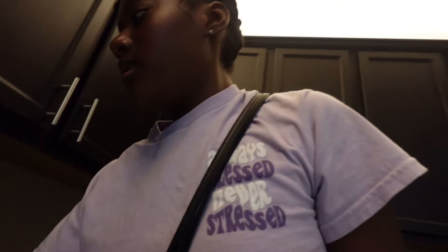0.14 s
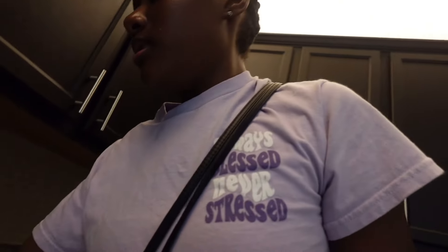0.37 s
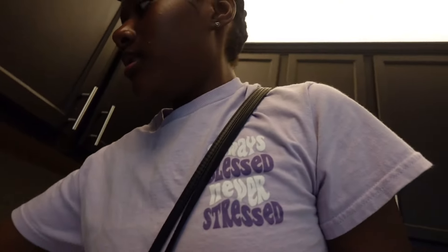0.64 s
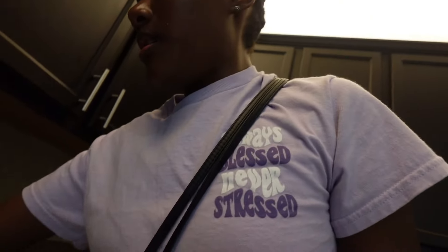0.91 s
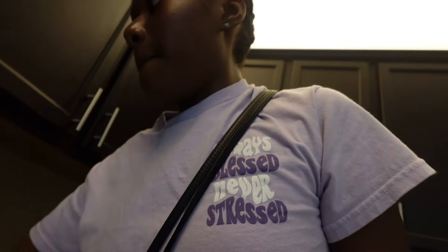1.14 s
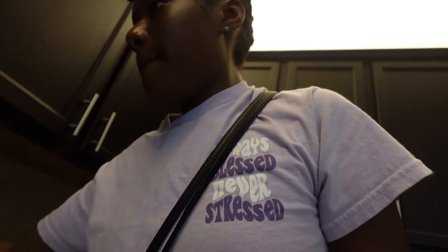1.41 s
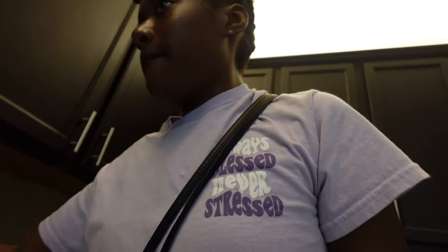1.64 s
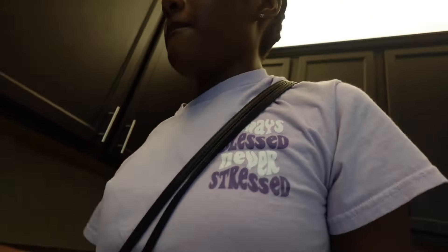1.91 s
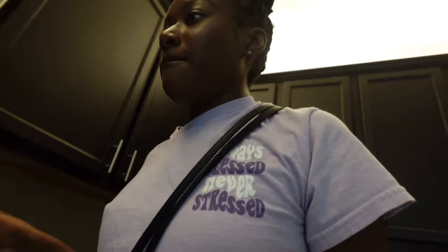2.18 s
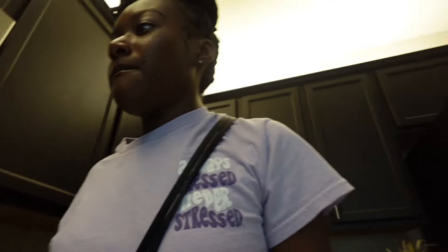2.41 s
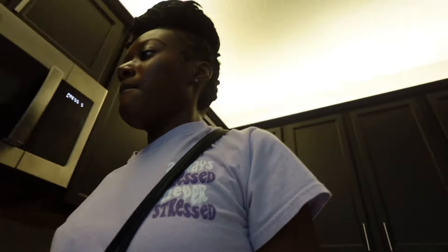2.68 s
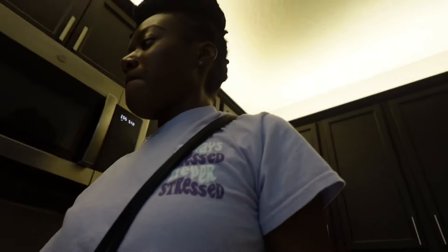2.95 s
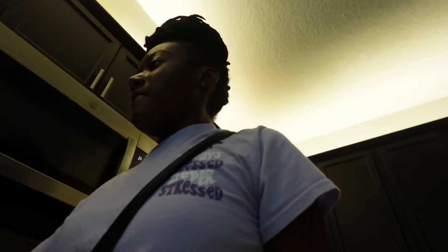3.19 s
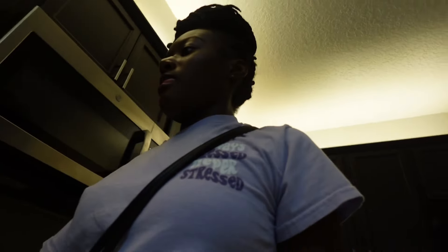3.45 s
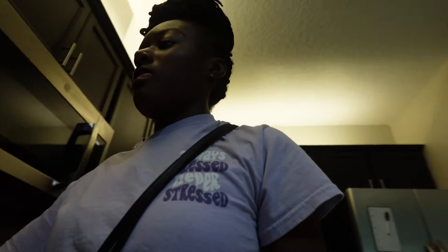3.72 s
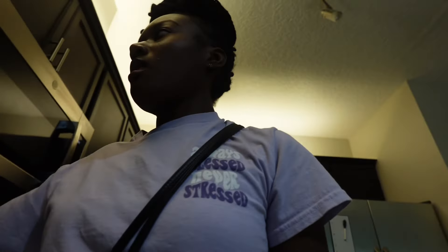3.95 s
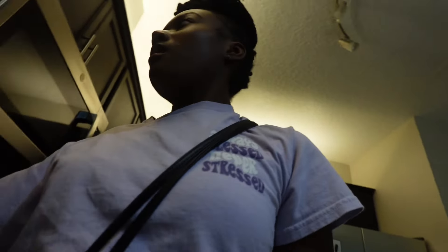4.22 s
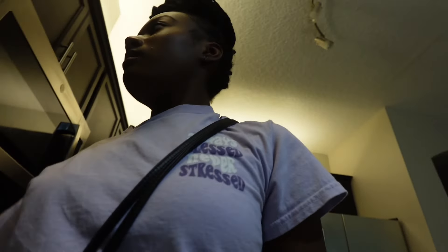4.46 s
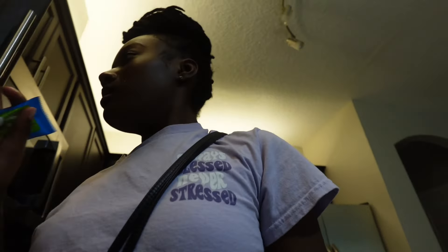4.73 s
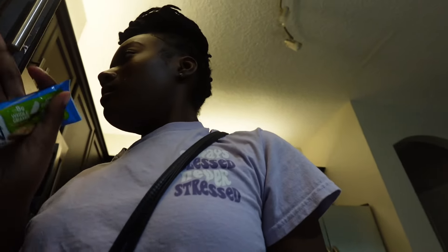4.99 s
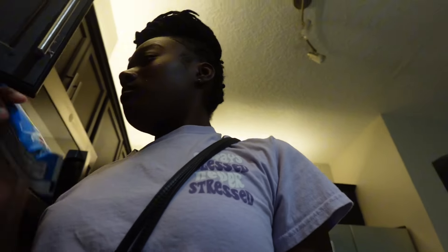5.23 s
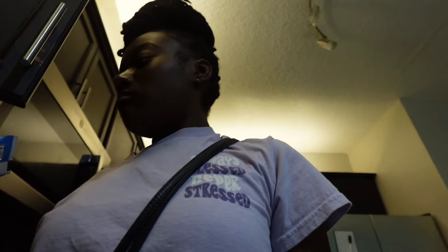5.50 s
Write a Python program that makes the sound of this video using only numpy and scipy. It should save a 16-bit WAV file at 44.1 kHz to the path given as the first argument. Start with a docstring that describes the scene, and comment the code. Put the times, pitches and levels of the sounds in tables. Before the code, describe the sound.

Close microphone, live kitchen room, faint air and appliance hum. An opening wooden bang rattles shelves and something slides. Dense plastic wrapper snaps follow, thin out briefly, then a light latch knock and a second heavy door thud. Afterwards packets held near the microphone crackle crisply and irregularly, the loudest snaps slightly clipped.

```python
"""A small hard kitchen, microphone close: room air and two faint appliance tones that end by 3.2 s.
A cupboard blow sets resonant panels rattling, with a hollow pop and a smooth glide of filtered noise.
From 0.7 s a hand grips stiff packets: noise-burst snaps over dense crackle, with decaying sine pops.
From 2.1 s the packets are held near the microphone; a latch at 2.7 s and a door blow at 3.3 s ring too.
The room answers the packets and pops, and the loudest snaps overload the recorder."""
import sys
import numpy as np
from scipy import signal
from scipy.fft import rfft, irfft, next_fast_len
from scipy.io import wavfile
from scipy.ndimage import map_coordinates

SR = 44100
rng = np.random.default_rng(int(sys.argv[2]) if len(sys.argv) > 2 else 0)


def elevation(decibels):
    """Turn decibel levels (scalar or array-like) into linear amplitude ratios."""
    levels = np.asarray(decibels, float)
    return 10 ** (levels / 20)


def generate_wav(sig):
    """Save sig (samples, or channels by samples) to the path in sys.argv[1] as 16-bit PCM at SR."""
    pcm = np.round(np.clip(np.atleast_2d(sig).T, -1, 1) * 32767).astype(np.int16)
    wavfile.write(sys.argv[1], SR, pcm)


N = 248008
LIFTED_S = 2.1  # the packets lie inside the cupboard until now, then are held near the microphone


def unit(x):
    """Scaled to rms 1."""
    return x / np.sqrt(np.mean(x ** 2) + 1e-20)


def along(points, hz):
    """Values at hz, from (Hz, value) points on a log axis."""
    f, v = np.transpose(points)
    return np.interp(np.log(hz + 1), np.log(f + 1), v)


def wobble(rate):
    """A smooth random curve, rate knots a second."""
    knots = rng.standard_normal(int(N * rate / SR) + 4)
    return map_coordinates(knots, [np.arange(N) * rate / SR])


def filtered(x, response):
    """x times a complex response of frequency."""
    m = next_fast_len(x.shape[-1] + 8192)
    return irfft(rfft(x, m) * response(np.fft.rfftfreq(m, 1 / SR)), m)[..., :x.shape[-1]]


def coloured(x, spectrum):
    """x through a (Hz, dB) spectrum."""
    return filtered(x, lambda hz: elevation(along(spectrum, hz)))


def low_cut(f, corner):
    """First-order response that loses what lies below the corner (Hz)."""
    return 1j * f / (corner + 1j * f)


def resonance(f, centre, width):
    """Response of one damped mode, 1 at its centre (Hz)."""
    return 1j * f * width / (centre * centre - f * f + 1j * f * width)


def spread(x, other, side_db):
    """Two channels: x in the middle, other on the side; the close microphones hear the bass alike."""
    side = elevation(side_db) * filtered(other, lambda hz: hz / (hz + 350))
    return np.array([x + side, x - side])


def stroke(start, held, db, attack, t60):
    """An envelope: straight rise, hold, exponential fall."""
    t = np.arange(N) / SR - start
    return elevation(db - 60 * np.maximum(t - attack - held, 0) / t60) * np.clip(t / attack, 0, 1)


def background(air_db=-41):
    """Room air as coloured noise, and two appliance tones that waver in level and phase."""
    # colour of the room air: f/Hz, level/dB
    air_colour = [(40, -36), (200, -8), (420, -0.5), (1700, 1.5), (3500, -2), (8000, -13.5), (16000, -28.5)]
    # tones heard while the microphone is near the appliance: f/Hz, mean level/dB rms, from t/s, to t/s
    hum_tones = [(292, -52.5, 2.5, 3.2), (427, -52, -2, 3.08)]
    air = elevation(air_db) * unit(coloured(rng.standard_normal((2, N)), air_colour))
    t = np.arange(N) / SR
    hum = np.zeros(N)
    for hz, db, on, off in hum_tones:
        level = elevation(db + 3 * wobble(18)) * np.sqrt(2)
        fade = np.clip(np.minimum(t - on, off - t) * 10, 0, 1)  # 0.1 s in and out
        hum += level * np.sin(2 * np.pi * hz * t + 1.04 * wobble(16)) * fade
    return spread(*air, side_db=-7.0) + hum


def cupboard():
    """Each blow: a short crack, then panels and shelves rattle, building up and dying in resonances."""
    # blows: t/s, crack level/dB rms, rattle level/dB, build-up time constant/s, rattle t60/s
    blows = [(0.083, -10.5, -1.5, 0.27, 0.5), (2.725, -28, -27, 0.0027, 0.95),
             (3.295, -8.5, -2, 0.12, 0.55)]
    # what each blow rings in, door, latch, door; for each mode: f/Hz, width/Hz, relative level/dB
    panels = [
        [(184, 55, 24.5), (313, 124, 19), (1313, 145, 19.5), (1650, 140, 14.5), (2540, 106, 18.5),
         (4210, 240, 4), (6350, 190, 7.5)],
        [(429, 250, 16.5), (1074, 430, 16), (1465, 170, 20)],
        [(324, 143, 29.5), (744, 1100, 14.5), (1485, 380, 22.5), (1785, 280, 27), (5500, 1500, 13.5)],
    ]
    out, t = np.zeros((2, N + SR)), np.arange(SR) / SR

    def dull(f):  # wood passes little treble
        return 1 / (1 + 1j * f / 8000) ** 3

    for (s, crack_db, rattle_db, build, t60), panel in zip(blows, panels):
        def wood(f):
            return dull(f) * sum(elevation(db) * resonance(f, c, w) for c, w, db in panel)

        def struck(f):  # the bass takes time to build, so the crack lacks it
            return (wood(f) + 0.04 * dull(f)) * low_cut(f, 800) ** 2

        noise = rng.standard_normal((3, SR))
        shudder = elevation(1.65 * wobble(66.2)[:SR])
        swell = elevation(rattle_db - 60 * t / t60) * (1.2 - np.exp(-t / build))
        rattle = unit(filtered(noise[:2] * shudder, wood)) * swell
        crack = filtered(noise[2] * (t < .0045), struck)
        crack = elevation(crack_db) * crack / np.std(crack[:200])
        out[:, round(s * SR):][:, :SR] += crack + spread(*rattle, side_db=-10)
    return out[:, :N]


def pops():
    """Soft taps ring a hollow container or latch: sines that fall 60 dB in 16 cycles."""
    # pops: t/s, level/dB before the 12.5 dB added below, f/Hz
    pop_rows = [(0.134, -12.5, 1600), (0.852, -31, 494), (0.894, -32, 556), (0.908, -25.5, 574),
                (0.952, -23, 800), (1.118, -32, 655), (1.14, -28, 660), (2.14, -23.5, 1316),
                (2.28, -25, 1320), (2.837, -23, 1900), (3.2949, -15.5, 1860)]
    out, t = np.zeros(N + SR), np.arange(SR // 10) / SR
    for s, db, hz in pop_rows:
        decay = elevation(db + 12.5 - 60 * t * hz / 16)
        onset = 1 - np.exp(-t / 0.00034)
        out[round(s * SR):][:len(t)] += decay * np.sin(2 * np.pi * hz * t) * onset
    return out[:N]


def room(x, wet_db):
    """The kitchen's answer: a new noise tail every quarter second, each frequency dying at its own speed."""
    # decay of the kitchen: f/Hz, t60/s
    kitchen_decay = [(200, 1), (2000, 0.35), (10000, 0.65)]
    out, step = np.zeros((2, N + SR)), SR // 4
    for k in range(0, N, step):
        hz, t, z = signal.stft(rng.standard_normal((2, SR // 2)), SR, nperseg=256)
        fall = elevation(-60 * t / along(kitchen_decay, hz)[:, None])
        tail = signal.istft(z * fall, SR, nperseg=256)[1]
        tail = spread(*tail, side_db=-45.0) / np.linalg.norm(tail[0])
        wet = signal.fftconvolve(x[None, k:k + step], tail, axes=1)
        out[:, k:k + wet.shape[1]] += wet
    return elevation(wet_db) * np.pad(out, ((0, 0), (130, 0)))[:, :N]  # the echo starts 3 ms late


def slide():
    """Something glides smoothly just after the first blow: coloured noise under one long stroke."""
    # colour of the glide: f/Hz, level/dB
    slide_colour = [(200, -16), (900, -15), (1500, -5), (15000, -39)]
    noise = rng.standard_normal((2, N)) * elevation(1.2 * wobble(39.3))
    glide = spread(*unit(coloured(noise, slide_colour)), side_db=-8.5)
    return stroke(start=0.28, held=0.06, db=-27.5, attack=0.087, t60=0.98) * glide


def effort():
    """How hard the packets are worked: the grips alone, and with the slow unfolding after each."""
    # each grip of the hand on a packet: start t/s, held/s, crackle level/dB
    grips = [(0.72, 0.06, -24), (.815, .08, -20.5), (0.941, 0.021, -18), (1, .06, -22), (1.11, .065, -19.5),
             (1.277, .06, -25), (1.494, 0.023, -19), (1.718, .05, -24), (1.911, .015, -18),
             (1.998, 0.026, -27.5), (2.885, .015, -29), (3.432, 0.027, -22.5), (3.568, 0.049, -20),
             (3.749, .13, -25.5), (3.969, 0.018, -28), (4.2, .4, -35.5), (4.786, .07, -27.5),
             (4.899, 0.024, -23.5), (5.094, .09, -27.5), (5.266, .06, -27.5), (5.41, .2, -30)]

    def power(less_db, t60):
        return sum(stroke(s, held, db + less_db, .012, t60) ** 2 for s, held, db in grips)

    grip = power(0, 0.11)
    unfolding = power(-7.5, 1.7)
    return np.sqrt(grip), np.sqrt(grip + unfolding)


def crackle(level, rate=350, size_db=4):
    """Tiny creases in clumps, denser the harder the hand works, each a noisy burst, over rubbing noise."""
    # colour of the crackle: f/Hz, level/dB
    crackle_colour = [(200, -28), (600, -11), (1370, -4.5), (2290, 6), (2900, 2), (5000, 2.5), (9000, -8),
                      (16000, -24)]
    density = np.clip(level / elevation(-24), .25, 3) * elevation(4 * wobble(35))
    creases = rng.random(N) < rate / SR * density
    sizes = creases * elevation(size_db * np.minimum(rng.exponential(size=N), 2))
    sizes = sizes / np.sqrt(np.clip(level / elevation(-28), .25, 3))
    life = signal.lfilter([1], [1, -elevation(-60 / SR / .004)], sizes)  # t60 4 ms
    grains = unit(life) * rng.standard_normal((2, N))
    rubbing = rng.standard_normal((2, N))
    grain_share = np.where(np.arange(N) < LIFTED_S * SR, 0.4, 0.59)  # inside, held near
    mixed = grain_share * grains + (1 - grain_share) * rubbing
    return level * spread(*unit(coloured(mixed, crackle_colour)), side_db=-15.5)


def strays(level, count=190):
    """Lesser snaps (t/s, level/dB, f/Hz) at random moments that crowd and grow where the grip is hard."""
    share, luck = np.cumsum(np.sqrt(level)), rng.random(count)
    size, pitch = rng.standard_normal((count, 2)).T
    at = np.searchsorted(share, luck * share[-1])
    db = 10 * np.log10(level[at]) - 3 + 7.5 * np.minimum(size, 1)  # rises half as fast as the grip's dB
    return np.transpose([at / SR, db, 3200 * 2 ** (0.79 * pitch)])


def snaps(rows, after_db=-11, after_s=.008, rise_s=.001):
    """A crease flips: a noisy burst of milliseconds, humped at its pitch; neighbours follow in moments."""
    s, db, hz = np.transpose(rows)
    inside = s < LIFTED_S
    t = np.arange(2048) / SR
    luck, noise = rng.random((len(s), 3, 5)), rng.standard_normal((len(s), len(t)))
    # the crease itself at once, then four smaller neighbours
    delay = -after_s * np.log(luck[:, 0]) + 0.0014
    size = elevation(after_db - 2.7 * luck[:, 1])
    delay[:, 0], size[:, 0] = 0, 1
    age = t - delay[..., None]
    decays = size[..., None] * (age >= 0) * elevation(-60 * np.abs(age) / 0.0044)  # t60 4.4 ms
    flips = decays.sum(1) * noise
    flips[:, 0] = np.where(inside, 1.6, 3.3) * np.sign(noise[:, 0])  # the first instant is a firm click
    centre = hz[:, None]
    width = centre / np.where(inside, 3.9, 2.6)[:, None]

    def body(f):
        broad = low_cut(f, 1600) ** 3 / (1 + 1j * f / 9000)
        hump = resonance(f, centre, width) + 0.035 * broad
        return hump * low_cut(f, 1150) ** 2  # a small crease moves no bass

    bursts = filtered(flips, body)
    bursts = bursts / np.abs(bursts[:, :100]).max(1, keepdims=True)
    out, pan_db = np.zeros((2, N + SR)), 0.72 + 6 * (luck[:, 2, 0] - .5)
    for k, burst in enumerate(bursts):
        sides_db = db[k] + np.array([[pan_db[k]], [-pan_db[k]]])
        out[:, round((s[k] + rise_s) * SR):][:, :len(t)] += elevation(sides_db) * burst
    return out[:, :N]


def scene():
    """Close sounds, their echo, the cupboard, the glide and the background."""
    # the snaps that stand out, stiff creases and edges: t/s, peak level/dB before panning, f/Hz
    snap_rows = [(0.829, 1, 2390), (0.877, 0, 4100), (0.883, 0, 2230), (0.949, -1, 3930), (0.963, -9, 1650),
                 (1.028, 1, 2020), (1.106, -1, 2200), (1.122, -1.5, 2150), (1.17, 4, 3620),
                 (1.283, -3.5, 2710), (1.3, -4, 2930), (1.323, -3.5, 2084), (1.393, 0.5, 2250),
                 (1.481, -3, 2200), (1.51, 0, 2200), (1.565, 1.5, 2380), (1.672, -8, 3874),
                 (1.725, 1, 2520), (1.757, -2.5, 2255), (1.859, -1, 2500), (1.915, -1.5, 3108),
                 (1.996, -3, 1848), (2.007, 0.5, 3480), (2.139, -2, 4730), (2.156, -6.5, 1520),
                 (2.279, -6.5, 4120), (2.3, -2.5, 3870), (2.414, -7.5, 3200), (2.89, -8, 4170),
                 (2.968, -8.5, 3500), (3.074, -4, 5120), (3.442, -5, 4080), (3.578, -5, 2300),
                 (3.607, -2, 2268), (3.726, -6, 2570), (3.776, -1.5, 4220), (3.804, -4, 8160),
                 (3.813, -4, 4800), (3.843, -11, 3960), (3.86, -1, 4040), (3.873, -5, 2220),
                 (3.918, -1, 2340), (3.973, 3, 3940), (4.043, -4, 6160), (4.064, -2, 5500),
                 (4.097, -5, 2410), (4.105, -1.5, 3240), (4.171, -4.5, 2500), (4.229, -5, 2540),
                 (4.324, -10, 4040), (4.351, -1.5, 4520), (4.408, -11, 3570), (4.422, -5.5, 3040),
                 (4.495, -13, 4270), (4.575, -7.5, 3110), (4.63, 3.5, 3760), (4.726, -3, 5070),
                 (4.791, 2, 3620), (4.84, 5, 3215), (4.853, 1, 5260), (4.897, -5.5, 2480),
                 (4.915, -1, 3580), (5.053, -12.5, 4600), (5.082, -24, 2000), (5.101, -4.5, 2080),
                 (5.13, -3.5, 3790), (5.165, -9, 5860), (5.18, -4, 2200), (5.197, -0.5, 4500),
                 (5.26, -17, 2320), (5.279, 3.5, 2380), (5.302, -1, 6300), (5.315, -6, 3330),
                 (5.375, -2, 2340), (5.409, 2.5, 4150), (5.448, -3, 6000), (5.481, -1.5, 5110),
                 (5.544, -4.5, 5500), (5.601, -3, 6650)]
    grip, level = effort()
    close = snaps(np.vstack([snap_rows, strays(grip)])) + pops() + crackle(level)
    return close + room(close.mean(0), wet_db=-8) + cupboard() + slide() + background()


def roll_off(x):
    """The treble ends steeply here."""
    return signal.sosfilt(signal.butter(12, 16990, fs=SR, output="sos"), x)


def record(dry):
    """The microphone drops deep bass and all above 15.9 kHz; the loudest peaks strain it and clip."""
    x = filtered(dry, lambda hz: low_cut(hz, 110) ** 2 * (hz < 15900))
    x = x + 0.093 * x ** 4  # the capsule strains to one side on the sharpest peaks: a faint thump under them
    x = x / (1 + np.abs(x / .98) ** 16) ** (1 / 16)  # the converter rounds off what goes over full scale
    return roll_off(x)


dry = scene()
out = record(dry)
generate_wav(out)
```